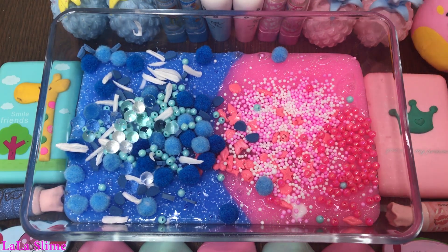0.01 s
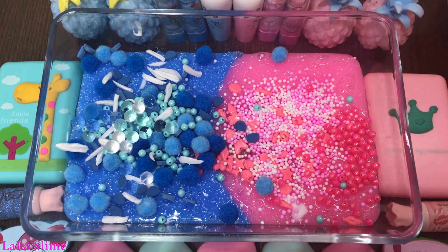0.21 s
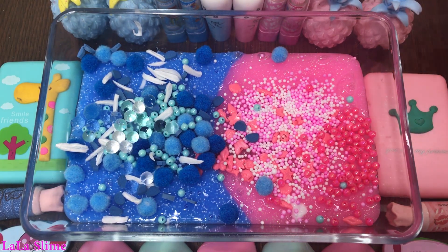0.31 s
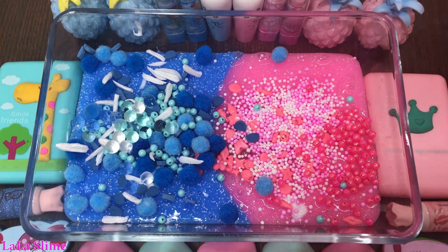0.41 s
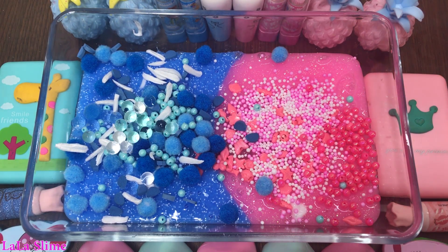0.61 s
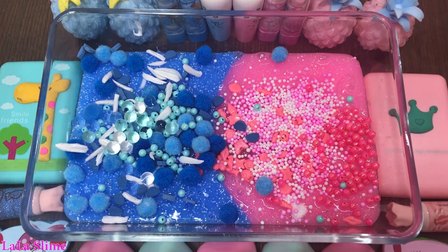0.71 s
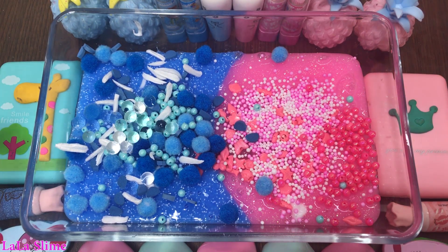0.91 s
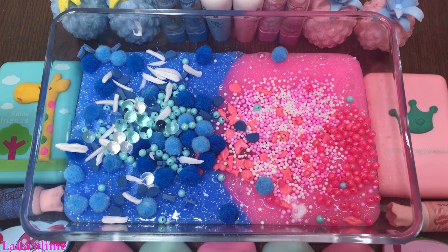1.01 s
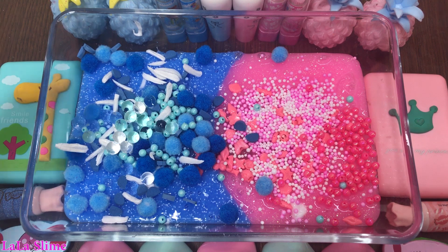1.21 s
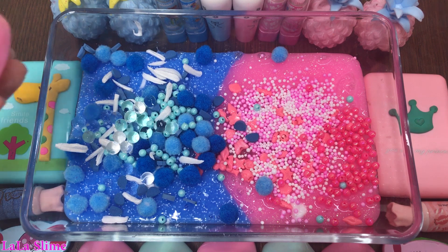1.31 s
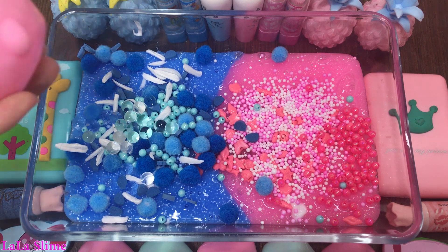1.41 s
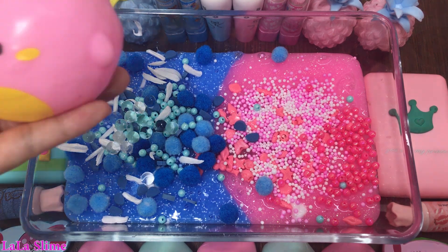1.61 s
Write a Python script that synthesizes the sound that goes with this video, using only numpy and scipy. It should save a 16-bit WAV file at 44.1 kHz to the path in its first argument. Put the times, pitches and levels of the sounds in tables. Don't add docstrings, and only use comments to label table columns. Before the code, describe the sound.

A loud, dry, hollow hard-plastic click at 0.2 seconds is the main sound. Before it come a faint pop at 0.02, soft grainy finger friction around 0.05, and a quick run of light taps from 0.14 to 0.18. A low table thud and room echo follow. Tiny high wet slime ticks sound at 0.37 and 0.49-0.58. The echo cuts off near 0.65, leaving quiet rumble, hum and hiss.

```python
import sys
import numpy as np
from scipy import signal
from scipy.fft import rfft, irfft
from scipy.io import wavfile

SR = 44100
rng = np.random.default_rng(int(sys.argv[2]) if len(sys.argv) > 2 else 0)


def dump(signal):
    limited = np.clip(np.atleast_2d(signal).T, -1, 1)
    pcm = np.round(limited * 32767).astype(np.int16)
    wavfile.write(sys.argv[1], SR, pcm)


def level_to_linear(level):
    exponent = np.asarray(level, float) / 20
    return 10 ** exponent


N = 74970

# f/Hz, level/dB
TAP_CRACK = [(600, -13.5), (1400, -8), (3000, -2), (4600, -5), (6500, -17.5), (11500, -21.5), (14000, -16),
             (16500, -23)]


def evened(x):
    return x / np.sqrt(np.mean(x ** 2) + 1e-20)


def read(points, hz):
    f, value = np.transpose(points)
    return np.interp(np.log(hz + 1), np.log(f + 1), value)


def resonate(x, hz, width_hz):
    turn = np.exp(2j * np.pi * hz * np.arange(len(x)) / SR)
    r = np.exp(-np.pi * abs(width_hz) / SR)
    return 2 * (turn * signal.lfilter([1 - r], [1, -r], x / turn)).real


def struck(body, blows, crack, crack_db, crack_t60_s):
    rise_s, radiate_hz = 0.00053, 585
    t = np.arange(N) / SR
    push = np.zeros(N)
    for start_s, db, soft_ms in blows:
        pulse = np.exp(-.5 * ((t - start_s) / (abs(soft_ms) / 1000)) ** 2)
        push += level_to_linear(db) * pulse / (abs(soft_ms) * SR / 400)

    u = t[:4096]
    rise = 1 - np.exp(-u / rise_s)
    ring = rise * sum(level_to_linear(db - 60 * u / t60) * np.sin(2 * np.pi * hz * u) for hz, db, t60 in body)

    colour = level_to_linear(read(crack, np.fft.rfftfreq(len(u), 1 / SR)))
    noise = evened(irfft(rfft(rng.standard_normal(len(u))) * colour))
    noisy = rise * level_to_linear(crack_db - 60 * u / crack_t60_s) * noise
    smooth = np.roll(irfft(colour), 128)
    smooth = smooth * np.linalg.norm(noisy) / np.linalg.norm(smooth)

    both = ring + np.array([noisy, smooth])
    sound = signal.fftconvolve(push[None], both, axes=1)[:, :N]
    return signal.sosfilt(signal.butter(4, radiate_hz, "high", fs=SR, output="sos"), sound)


def click():
    # f/Hz, level/dB, t60/s
    click_body = [(1011, -4, 0.033), (810, -25, .04), (1380, -14, 0.036), (1648, -0.5, 0.0097),
                  (2011, -14, 0.061), (3110, -19.5, 0.0062), (4741, -17, 0.017), (9190, -28, 0.018),
                  (14300, -20, .004)]
    # t/s, level of the pulse's sum/dB, softness/ms
    click_blows = [
        (0.1975, -32.5, 0.012567),
        (0.1988, -27, .1),
        (.2025, 0.5, 0.01274),
        (0.2058, -16, 0.018),
    ]
    # f/Hz, level/dB
    click_crack = [(600, -12.5), (1600, -2.5), (3200, -4.5), (6000, -14), (9500, -18.5), (11800, -25.5),
                   (14200, -22.5), (16500, -24.5)]
    return struck(click_body, click_blows, click_crack, crack_db=-10.5, crack_t60_s=.024)


def tap():
    # f/Hz, level/dB, t60/s
    tap_body = [(991.5, -4, 0.052), (1309, 10, 0.017), (1520, -7.5, .014), (2089, -15.5, 0.04),
                (4043, -16, .009), (4700, -13, .014)]
    # t/s, level of the pulse's sum/dB, softness/ms
    tap_blows = [
        (.1435, -42, .013),
        (.1497, -26, .013),
        (.1530, -31, .013),
        (.1608, -38, .03),
        (.1642, -38, .04),
        (.1755, -40, .04),
        (.1830, -43, .04),
    ]
    return struck(tap_body, tap_blows, TAP_CRACK, crack_db=-8, crack_t60_s=0.033)


def pop():
    # f/Hz, level/dB, t60/s
    pop_body = [(1080, 3.5, 0.012), (756, -3, .006)]
    # t/s, level of the pulse's sum/dB, softness/ms
    pop_blow = [
        (.0190, -33, 0.1),
    ]
    return struck(pop_body, pop_blow, TAP_CRACK, crack_db=-23, crack_t60_s=0.0095)


def thud():
    # f/Hz, level before the swell/dB, t60/s
    thud_modes = [(140, -46, 0.21), (209.57, -48, 0.17), (300, -43, 0.13), (430, -39, 0.13),
                  (523, -30.5, 0.031)]
    start_s, rise_s = .208, .008
    u = np.maximum(np.arange(N) / SR - start_s, 0)
    ring = sum(level_to_linear(db - 60 * u / t60) * np.sin(2 * np.pi * hz * u) for hz, db, t60 in thud_modes)
    return (1 - np.exp(-u / rise_s)) * ring


def brush():
    # f/Hz, width/Hz, level/dB
    brush_body = [(895, 400, -6), (2900, 200, 1.5), (3150, 190, -7.5), (4670, 1800, -12.5), (7000, 560, -4),
                  (9300, 2960, -14), (14300, 3000, -14)]
    start_s, swell_s, fade_s = .034, .018, .011
    level_db, trail_db, trail_t60_s = -56.5, -6, .4
    u = np.arange(N) / SR - start_s
    swell = np.clip(u / swell_s, 0, 1)
    shape = np.where(u < swell_s, swell, np.exp(-((u - swell_s) / fade_s) ** 2))
    shape = shape + level_to_linear(trail_db - 60 * np.abs(u) / trail_t60_s) * (u > 0)
    grain_db = 1.5 * np.repeat(rng.exponential(1, N // 32 + 1), 32)[:N]
    grit = rng.standard_normal(N) * level_to_linear(grain_db)
    rub = sum(level_to_linear(db) * evened(resonate(grit, f, w)) for f, w, db in brush_body)
    return level_to_linear(level_db) * shape * evened(rub)


def ticks():
    # t/s, peak level/dB, f/Hz, length/cycles
    tick_events = [
        (.0305, -56, 10200, 1.02),
        (0.368, -50.5, 13500, 3),
        (.4860, -41, 11000, 0.47),
        (0.548, -36, 15000, 0.83),
        (.5490, -48, 14700, 8.6),
        (0.5829, -46, 10900, 0.62),
    ]
    t = np.arange(N) / SR
    out = np.zeros(N)
    for start_s, db, hz, cycles in tick_events:
        u = t - start_s
        out += level_to_linear(db) * np.exp(-(u * hz / cycles) ** 2) * np.sin(2 * np.pi * hz * u)
    return out


def room(x):
    # f/Hz, t60/s
    room_t60 = [(250, 0.5), (550, 0.39), (1000, 0.79), (2000, 0.85), (3500, 0.821), (6000, 0.64),
                (10000, 0.5), (15000, 0.27)]
    # f/Hz, level/dB
    room_colour = [(200, -8.5), (500, 14.5), (1000, -3.5), (2000, 1), (4000, -2.5), (8000, -0.5),
                   (11000, 2), (15000, -0.5)]
    level_db, delay_s, build_s = -8.5, 0.0041, 0.0056
    taps = np.zeros(SR)
    count = (SR - 1) // 20
    spots = np.arange(0, SR - 20, 20) + rng.integers(0, 20, count)
    taps[spots] = rng.choice([-1., 1.], count)
    hz, t, z = signal.stft(taps, SR, nperseg=256)
    decay_db = read(room_colour, hz)[:, None] - 60 * t / read(room_t60, hz)[:, None]
    tail = signal.istft(z * level_to_linear(decay_db), SR, nperseg=256)[1]
    tail = tail * np.clip((np.arange(len(tail)) / SR - delay_s) / build_s, 0, 1)
    return level_to_linear(level_db) * signal.fftconvolve(x, tail / np.linalg.norm(tail))[:N]


def floor():
    # f/Hz, density/(dB per Hz)
    floor_colour = [(90, -35), (140, -11), (200, -5.5), (450, -12.5), (700, -16), (1430, -22.5),
                    (7000, -32), (15800, -36.5)]
    # f/Hz, width/Hz, rms level/dB
    hums = [(55.76, 9, -63.5), (92, 14, -67), (111.4, 5.2, -67.5), (166, 72, -75.5), (193.3, 4.8, -78.5),
            (331.5, 56, -72.5)]
    hz = np.fft.rfftfreq(N, 1 / SR)
    low_cut = 1 / (1 + (60 / (hz + 1)) ** 6)
    spectrum = rfft(rng.standard_normal(N)) * level_to_linear(read(floor_colour, hz)) * low_cut
    out = level_to_linear(-64.5) * evened(irfft(spectrum, N))
    for f, width_hz, db in hums:
        once = resonate(rng.standard_normal(N), f, width_hz)
        out += level_to_linear(db) * evened(resonate(once, f, width_hz))
    return out


def scene():
    change_s, fade_s, air_edge_hz = .648, 0.0027, 15850
    near, sent = click() + brush() + thud() + tap() + pop()
    kept = np.clip((change_s - np.arange(N) / SR) / fade_s, 0, 1)
    air = (near + room(sent)) * kept + floor()
    air = signal.oaconvolve(air, signal.firwin(511, air_edge_hz, fs=SR), "same")
    return (air + ticks())[None]


def low_pass(x):
    return signal.sosfilt(signal.butter(12, 16800, fs=SR, output="sos"), x)


def record(dry):
    x = signal.oaconvolve(dry, signal.firwin(255, 16600, fs=SR)[None], "same")
    return low_pass(x)


dry = scene()
out = record(dry)
dump(out)
```